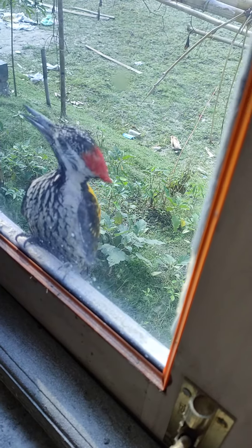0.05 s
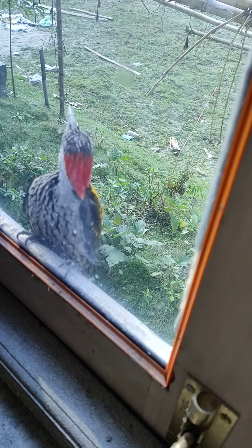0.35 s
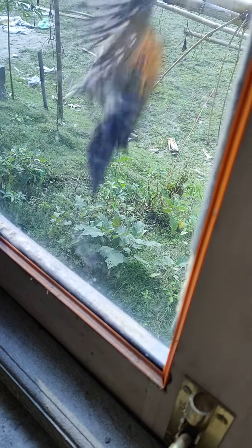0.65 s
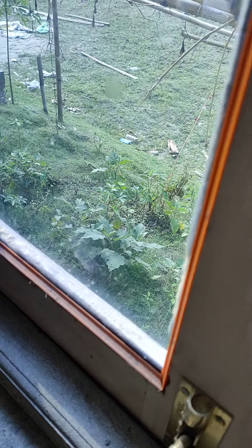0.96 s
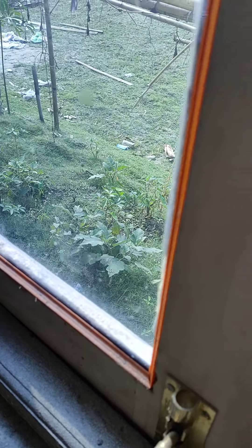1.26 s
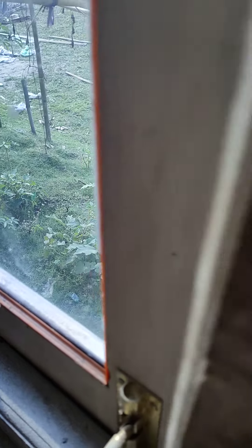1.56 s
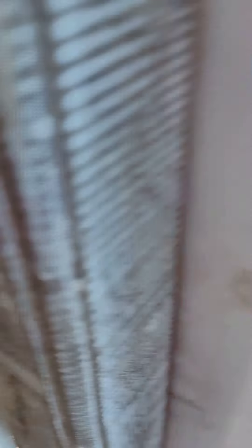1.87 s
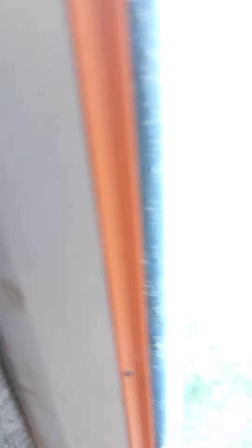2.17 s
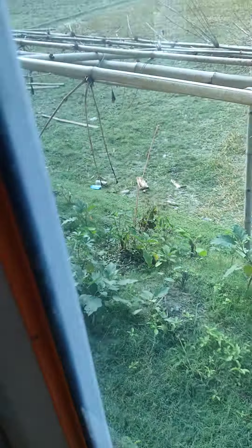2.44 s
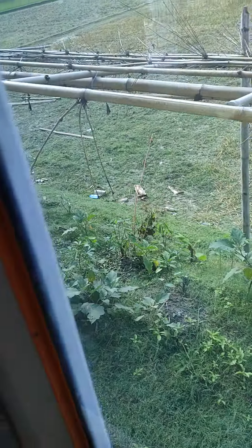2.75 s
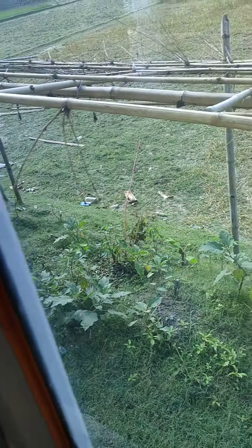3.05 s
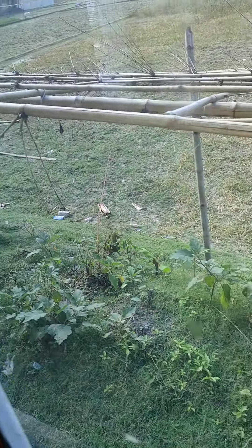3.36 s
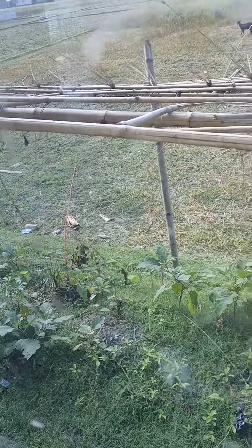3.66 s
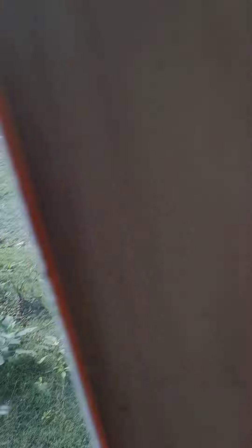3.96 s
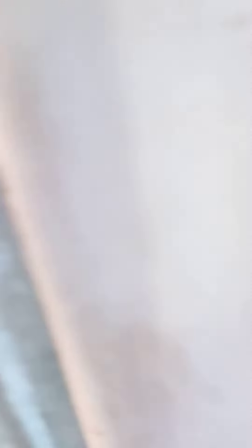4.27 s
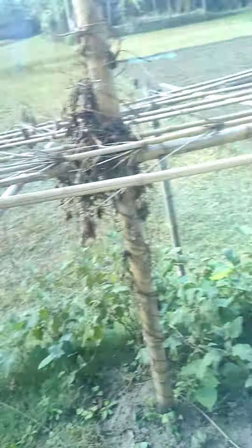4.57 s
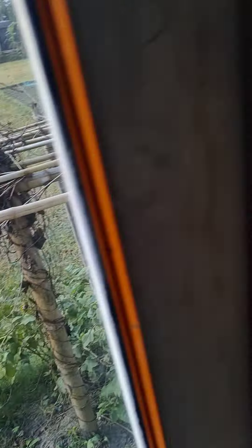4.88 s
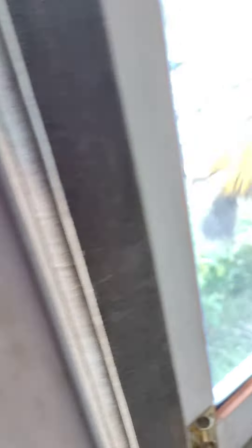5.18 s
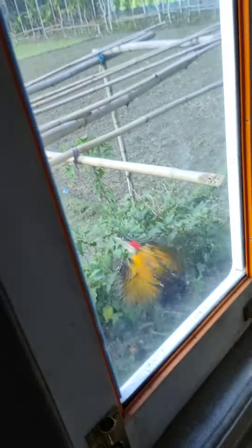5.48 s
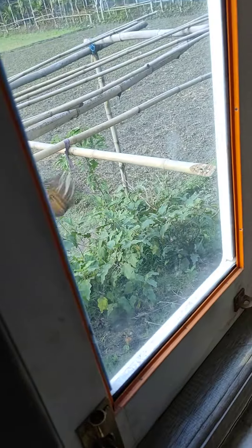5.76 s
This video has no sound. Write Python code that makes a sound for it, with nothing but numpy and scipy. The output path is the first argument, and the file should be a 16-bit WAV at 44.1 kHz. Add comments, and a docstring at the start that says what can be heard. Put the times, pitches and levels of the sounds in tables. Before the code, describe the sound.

A quiet low rumble and soft air run throughout, heard near a window inside a bare, echoing room. At 0.7 seconds a woodpecker's claws softly scuff the frame. Outside, a small bird whistles two faint phrases, around 0.5 to 1.9 and 2.6 to 3.9 seconds, with brief flock chatter, far-off calls and a barely audible insect. Soft wingbeats approach, and at 2.25 seconds the beak hits the pane with a loud glassy clack, a thump and low ringing. A lighter tap follows at 2.5, then light wing brushes and rustles. Wings whoop in again from 4.2 seconds. The two heaviest blows land at 4.5 and 4.8, their echo swelling back after each impact. Three quick, sharp taps follow by 5.0, amid bursts of feathers brushing the glass. Tiny ticks and flutters end around 5.4, and the echo fades into the quiet background.

```python
"""A woodpecker flies at a window pane, strikes it and flutters against it, heard in a bare, echoing room.
Each blow shoves the whole pane (a thump), sets it ringing and makes the glass clack. Wings whoop in
flight and brush the glass; claws scuff the frame. A phone's limiter turns the hard blows down and lets
their echo swell back. Outside, a small bird whistles two phrases over the chatter of its flock.
Behind it all are soft rustles, far-off calls, a faint insect, quiet air and a low rumble."""
import sys
import numpy as np
from scipy import signal
from scipy.fft import rfft, irfft
from scipy.io import wavfile
from scipy.ndimage import uniform_filter1d, minimum_filter1d

SR = 44100
rng = np.random.default_rng(int(sys.argv[2]) if len(sys.argv) > 2 else 0)


def to_wav(s):
    """Save 16-bit WAV."""
    ch = np.atleast_2d(s).T  # columns
    pcm = np.round(np.clip(ch, -1, 1) * 32767)  # PCM
    wavfile.write(sys.argv[1], SR, pcm.astype(np.int16))


N = 261072
T = np.arange(N) / SR

# The bird hits the pane with its weight behind the beak: (time [s], clack [dB], thump [dB], thump [Hz],
# place across the pane [0-1], echo [dB], hollow knock [Hz], knock [dB], boom [Hz], boom [dB])
BLOWS = [(2.249, 8.5, 2, 313, .3, 6, 510, -17, 103, -7),
         (4.4794, 13, 11.5, 375, 0.14, 1.5, 457, -12, 168.3, 1.5),
         (4.8093, 15, 15.5, 320, .27, -3, 1156, -12.5, 100.4, 1.5)]
# Taps of the beak alone: (time [s], clack [dB], ping [Hz], second ping [Hz], echo [dB],
# left minus right [dB])
TAPS = [(2.1477, -30, 3880, 4300, 4, -8), (2.2523, 7, 2680, 3030, -4, -14),
        (2.473, -3.5, 2490, 3050, -5.5, -4), (4.4561, -34, 5550, 4940, 13.5, 0),
        (4.4825, 7, 3220, 2660, -12, -12), (4.885, 2.5, 3220, 3760, -4, -3),
        (4.935, -6, 3550, 4100, 2.5, -6), (5.023, 1, 4030, 5054, -3.5, -2.5),
        (5.2425, -33, 4000, 4260, -6, -11), (5.3175, -31.5, 4140, 4700, -11, -7),
        (5.3357, -22, 3130, 3820, -18, 1.5), (5.358, -33.5, 2830, 1970, -20, -18)]
# Low tones of the bending pane: (pitch [Hz], level [dB], fade time [s])
# A fade time, t60 in the code, is how long a sound takes to drop by 60 dB.
PANE_TONES = [(55.2, -29.5, 1.1), (105.6, -22, 0.732), (177.9, -19, 0.7), (200.2, -21.5, 0.94),
              (231, -20.5, 0.66), (246, -30.5, 1.1), (323, -24.5, 0.33), (391.3, -27, 0.69),
              (483, -31.5, 0.53), (599, -25, 0.17), (841, -19.5, 0.22), (977, -32.5, 0.6),
              (1004, -29, 0.43), (1160, -29, 0.31)]
# Short tones that make up the clack of the glass: (pitch [Hz], level [dB], fade time [s])
CLACK_TONES = [(1068, -41, 0.0054), (1165, -20.5, 0.012), (1477, -34.5, 0.046), (2060, -13.5, 0.034),
               (2456, -27, 0.024), (2570, -47, 0.057), (3310, -28, 0.025), (3485, 0.5, 0.0046),
               (4360, -52.5, 0.005), (5110, -19.5, 0.02), (6240, -33, 0.005), (6030, -34, 0.02)]
# Tone colour of the sharp crack where beak meets glass: (frequency [Hz], level [dB])
CRACK_COLOUR = [(200, -25.5), (700, -7), (1200, 2), (2000, -3.5), (3300, 4.5), (5500, -3), (6600, -6),
                (8000, -27.5), (13000, -27.5), (16000, -59)]
# Tone colour of the pane's dull shudder in its frame: (frequency [Hz], level [dB])
SHUDDER_COLOUR = [(60, -25), (250, -11.5), (450, 2), (800, 0.5), (1200, 4), (1800, -12.5), (4000, -47.5)]
# Wingbeats on the flights towards the pane: (time [s], pitch [Hz], level [dB])
WINGBEATS = [(1.791, 375, -53.5), (1.951, 405, -54), (2.027, 465, -41), (4.19, 380, -55.5),
             (4.27, 380, -53.5), (4.348, 410, -45.5), (4.426, 460, -37.5)]
# Wings brushing the glass: (middle time [s], half length [s], level [dB], extra treble [dB])
WING_BRUSHES = [(2.389, 0.03, -34, 10), (2.497, 0.022, -53, 16.5), (2.585, 0.019, -42.5, 7.5),
                (2.674, 0.055, -55, 4), (2.784, 0.046, -59, 7), (2.862, 0.036, -60.5, 11),
                (2.942, 0.033, -59.5, 11), (4.617, 0.026, -21.5, 2.5), (4.716, 0.028, -29, -3),
                (4.801, 0.025, -40, -9), (4.88, 0.069, -22.5, -4), (4.98, 0.04, -30, -3.5),
                (5.077, 0.024, -30, 2), (5.162, 0.016, -37, 1), (5.245, 0.019, -52, 16),
                (5.276, 0.012, -41.5, 6.5), (5.336, 0.0079, -42.5, 8.5), (5.363, 0.033, -47, 8.5)]
# Lone soft rustles: (middle time [s], half length [s], level [dB], extra treble [dB])
LONE_RUSTLES = [(0.02, 0.15, -59, -23), (0.696, 0.017, -48, -5), (1.457, 0.02, -66.5, 11),
                (2.046, 0.18, -58, -2), (2.152, 0.011, -40, 5), (2.254, 0.056, -44.5, -23),
                (3.332, 0.098, -53.5, -0.5), (3.479, 0.029, -55.5, -21), (3.755, 0.015, -58, -16),
                (3.81, 0.15, -62.5, 1)]
# Tone colour of the brushes and rustles: (frequency [Hz], level [dB])
RUSTLE_COLOUR = [(300, 2), (700, -9.5), (1300, -2.5), (2000, 2.5), (3000, 7.5), (5800, 6.5), (8000, -9.5),
                 (13000, -13), (16000, -23.5)]
# The bird shifts its grip, then pushes off: (time [s], level [dB], rise time [s], fade time [s])
SCUFFS = [(0, -55.5, 0.0055, 0.7), (0.739, -41.5, 0.012, 0.8)]
# Hollow tone colour of those scuffs: (frequency [Hz], level [dB])
SCUFF_COLOUR = [(40, -5), (110, 6.5), (170, 9), (300, 1.5), (550, -10), (1100, 5), (1600, -2.5),
                (2100, -5.5), (3000, -4), (5600, 0.5), (7500, -20), (14000, -43)]
# The small bird's whistles: (time [s], length [s], start pitch [Hz], end pitch [Hz], level [dB])
SONG_NOTES = [(.48, 0.38, 4450, 4430, -75), (.74, 0.336, 4030, 3948, -66.5), (1.13, 0.14, 4980, 4240, -66),
              (1.18, 0.071, 3720, 3660, -63.5), (1.39, 0.11, 3220, 2950, -78),
              (1.32, 0.039, 3910, 3810, -60), (1.45, 0.045, 3870, 3820, -71),
              (1.54, 0.15, 2480, 2360, -78.5), (1.59, 0.057, 3600, 3370, -62),
              (1.69, 0.16, 3400, 3650, -62.5), (1.79, 0.12, 3770, 4070, -61),
              (2.58, 0.276, 4436, 4320, -64.5), (2.8, 0.18, 4040, 3990, -63.5),
              (2.97, 0.32, 3990, 3980, -77.5), (3.14, 0.076, 5100, 4400, -68),
              (3.2, 0.057, 4560, 4520, -75), (3.28, 0.16, 3880, 3780, -66),
              (3.57, 0.054, 4340, 3820, -69.5), (3.73, 0.19, 3900, 4150, -68),
              (5.8, 0.23, 3860, 3840, -75.5)]
# Start and end of the flock's sinking chatter: (time [s], pitch [Hz])
CHATTER = [(1.2, 4340), (1.62, 3320)]
# Far-off calls: (middle time [s], half length [s], pitch [Hz], level [dB])
FAR_CALLS = [(1.1, 0.98, 1247, -71), (1.854, 0.33, 5300, -66), (2.153, 0.2, 4875, -55.5),
             (3.452, 0.31, 1495, -67.5), (0.796, .5, 569, -69.5), (3.533, 0.29, 582, -67)]
# Tone colour of the low rumble: (frequency [Hz], level [dB])
RUMBLE_COLOUR = [(20, -6), (42, 5.5), (70, -3.5), (110, -10.5), (170, -11.5), (260, -21), (500, -39),
                 (1200, -62.5), (4000, -68.5)]
# Tone colour of the quiet air: (frequency [Hz], level [dB])
AIR_COLOUR = [(100, 7), (300, -1.5), (600, -2), (1200, -10), (2000, -13), (2700, -10), (4000, -11),
              (6000, -13.5), (7800, -23.5), (9000, -28.5), (11000, -28.5), (15000, -34)]
# Swells while the bird is near the window: (middle time [s], half length [s], rumble [dB], air [dB])
SWELLS = [(1.004, 1, -63.5, -71.5), (2.06, 0.33, -49, -61.5), (2.946, 0.21, -47, -67.5),
          (3.707, 0.26, -87.5, -69), (4.468, 0.23, -55.5, -65.5), (5.15, 0.67, -50, -64)]
# Bounces off the window recess and nearest wall: (left delay [s], right delay [s], level [dB])
EARLY_ECHOES = [(.0028, 0.0031, -8), (.0046, .0044, -12), (0.0104, .0125, -13.5)]
# The room's long echo, band by band: (frequency [Hz], level [dB], fade time [s])
ROOM_BANDS = [(38, 4.5, 1.9), (107, 15, 0.74), (213, 7.5, 0.69), (434, -0.5, 0.75), (1090, -3, 0.67),
              (2038, -0.5, 0.6), (3270, -3, 0.6), (5970, -2.5, 0.65), (7950, -3.5, 0.35), (14000, -4, .55)]


def pecks(ping_t60=0.016, knock_t60=0.02, right_lag_s=0.00021, pane_stilled_s=5.29, damping_db_per_s=216):
    """Each strike of the beak shoves the pane, sets its low tones ringing and clacks the glass."""
    direct, to_room = np.zeros((2, N)), np.zeros(N)
    t = T[:SR] - np.array([[0], [right_lag_s]])  # the left side hears it first
    late = t - .0005  # the glass rings just after the first push
    glass = sum(undb(db) * (-1) ** k * ring(late, hz, t60)
                for k, (hz, db, t60) in enumerate(CLACK_TONES))
    tones = pane_tones(2 * SR)
    crack, shudder = undb(12) * click(CRACK_COLOUR), undb(13) * click(SHUDDER_COLOUR)
    for start, clack_db, thump_db, thump_hz, place, echo_db, ping_hz, ping2_hz, pan_db, heavy in hits():
        sides = undb(np.array([[pan_db], [-pan_db]]) / 2)
        thump = shove(t, thump_hz)
        clack = glass + undb(-7) * ring(late, ping_hz, ping_t60)
        clack += undb(-9) * ring(late, ping2_hz, ping_t60)
        boom = 0
        if heavy:  # a heavy blow also knocks hollowly and boosts the tones near its boom pitch
            knock_hz, knock_db, boom_hz, boom_db = heavy
            thump += undb(knock_db) * ring(t, knock_hz, knock_t60)
            octaves_away = np.log2(np.array(PANE_TONES)[:, 0] / boom_hz)
            boom = undb(boom_db) * np.exp(-(octaves_away / .12) ** 2)
        add(direct, start, sides * (undb(thump_db) * thump + undb(clack_db) * clack))
        add(direct, start, sides * undb(clack_db - 12) * burst(CRACK_COLOUR, t60=0.028))
        add(direct, start + .001, sides * undb(thump_db - 14) * burst(SHUDDER_COLOUR, t60=0.042))
        # a tone rings most when the pane is struck where that tone bends it most
        strengths = boom + np.sin(np.pi * place * np.arange(1, len(PANE_TONES) + 1))
        # the next blow, or the bird pressing on the glass near the end, stops the ringing
        stop = min([blow[0] for blow in BLOWS if blow[0] > start] + [max(pane_stilled_s, start)])
        damping = undb(-damping_db_per_s * np.maximum(T[:2 * SR] - (stop - start), 0))
        add(direct, start, undb(thump_db) * damping * (strengths @ tones))
        # the room gathers sound from the whole pane, so single tones stand out less
        add(to_room, start, undb(echo_db + thump_db) * (undb(-4) * thump[0] + shudder))
        add(to_room, start, undb(echo_db + clack_db) * (crack + undb(-16) * clack[0]))
    out = direct + undb(2) * room(to_room)
    for left_s, right_s, db in EARLY_ECHOES:
        add(out[0], left_s, undb(db) * direct[0])
        add(out[1], right_s, undb(db) * direct[1])
    return out


def hits(blow_pings_hz=(3263, 3400), blow_pan_db=3.13, tap_thump_hz=320, tap_place=0.25):
    """List the heavy blows and the taps in one form; each has two pings from the struck spot."""
    rows = [(*blow[:6], *blow_pings_hz, blow_pan_db, blow[6:]) for blow in BLOWS]
    for start, clack_db, *pings_hz, echo_db, pan_db in TAPS:
        thump_db = -11.5 + 1.4 * clack_db  # light taps barely move the pane
        rows.append((start, clack_db, thump_db, tap_thump_hz, tap_place, echo_db,
                     *pings_hz, pan_db, None))
    return rows


def shove(t, hz, cycles=0.67, press_s=0.00042, leak_hz=95):
    """The pane jumps in and springs back: about one wave of pressure, whose deepest bass leaks away."""
    t = np.maximum(t, 0)
    rise = 1 - np.exp(-(t / press_s) ** 2)
    push = np.sin(2 * np.pi * hz * t) * np.exp(-(t * hz / cycles) ** 2) * rise
    return signal.lfilter(*signal.butter(1, leak_hz, "high", fs=SR), push)


def pane_tones(size, pitch_waver=0.0077, flicker_db=1):
    """The bending pane's tones waver in pitch and strength as it shifts in its frame."""
    slow_noise = colour(rng.standard_normal((2, len(PANE_TONES), size)), [(7, -7), (25, -63.5)])
    drifts, flickers = unit(slow_noise)
    clocks = np.cumsum(1 + pitch_waver * drifts, axis=1) / SR
    return np.array([undb(db + flicker_db * flicker) * ring(t, hz, t60)
                     for (hz, db, t60), t, flicker in zip(PANE_TONES, clocks, flickers)])


def thin_ring(start_s=2.15, level_db=-54.5):
    """The first light tap leaves a faint, high ring at the window."""
    return undb(level_db) * ring(T - start_s, hz=2660, t60=.4)


def wingbeats(half_length_s=0.008, room_db=1):
    """Wings whoop louder as the bird nears the pane; the last, braking beat is the highest."""
    out = sum(undb(db) * swell(middle, half_length_s) * np.sin(2 * np.pi * hz * (T - middle))
              for middle, hz, db in WINGBEATS)
    return out + undb(room_db) * room(out)


def rustles(grain_db=3, room_db=-3):
    """Wings brush the glass in short puffs of grainy noise; a few soft rustles come on their own."""
    grain = jitter(samples=90)
    noise = unit(colour(stereo_noise(N) * undb(grain_db * grain), RUSTLE_COLOUR))
    treble = colour(noise, [(6500, -19.5), (8500, -2.5)])
    body_level, treble_level = 0, 0
    for middle, half_length, db, treble_db in LONE_RUSTLES + WING_BRUSHES:
        level = undb(db) * swell(middle, half_length)
        body_level += level
        treble_level += undb(treble_db) * level
    out = (noise - treble) * body_level + treble * treble_level
    return out + undb(room_db) * room(out[0])


def scuffs(grain_db=2, room_db=-9):
    """Claws and feathers scuff the frame: a quick rise and a grainy fade."""
    grain = jitter(samples=200)
    level = 0
    for start, db, rise_s, t60 in SCUFFS:
        t = np.maximum(T - start, 0)
        level += undb(db - 60 * t / t60) * (1 - np.exp(-t / rise_s))
    out = level * unit(colour(stereo_noise(N) * undb(grain_db * grain), SCUFF_COLOUR))
    return out + undb(room_db) * room(out[0])


def small_birds(waver_hz=42, rasp=0.19, chirps=24, chirp_s=0.035, fall_hz=300, chirp_db=-72):
    """One bird whistles while its flock adds short falling chirps; both arrive mostly as echo."""
    song = np.zeros(N)
    quiver = unit(colour(rng.standard_normal(N), [(250, 19), (900, -55)]))
    notes = list(SONG_NOTES)
    chirp_times = np.linspace(CHATTER[0][0], CHATTER[-1][0], chirps)
    for start, (late, detune) in zip(chirp_times, rng.uniform(-1.1, 1, (chirps, 2))):
        hz = np.interp(start, *np.transpose(CHATTER)) * (1 + 0.19 * detune)
        notes.append((start + late * chirp_s / 2, chirp_s, hz + fall_hz / 2, hz - fall_hz / 2, chirp_db))
    for start, length, start_hz, end_hz, db in notes:
        progress = np.linspace(0, 1, int(length * SR))
        glide_hz = end_hz - start_hz
        wobble_hz = waver_hz + rasp * abs(glide_hz)  # notes that slide far are raspy
        hz = start_hz + glide_hz * progress + wobble_hz * np.roll(quiver, -int(start * SR))[:len(progress)]
        whistle = np.sin(2 * np.pi * np.cumsum(hz) / SR)
        add(song, start, undb(db) * np.sin(np.pi * progress) * whistle)
    return undb(-11) * song + undb(18) * room(song)


def far_calls(width=0.041):
    """Faint calls from far off, blurred into narrow bands of noise."""
    out = np.zeros((2, N))
    for middle, half_length, hz, db in FAR_CALLS:
        size = int(2 * half_length * SR)
        band = signal.butter(2, [hz * (1 - width), hz * (1 + width)], "band", fs=SR, output="sos")
        call = unit(signal.sosfilt(band, rng.standard_normal((2, 2 * SR))[:, :size]))
        add(out, middle - half_length, undb(db) * np.hanning(size) * call)
    return out


def insect(band_hz=(8400, 9100), level_db=-85.5, throb_db=2.5, until_s=4.2, fade_s=.1):
    """An insect's thin, throbbing shrill outside fades as the listener turns away."""
    band = signal.butter(2, band_hz, "band", fs=SR, output="sos")
    level = undb(level_db + throb_db * jitter(samples=1500))
    fade = (1 - np.tanh((T - until_s) / fade_s)) / 2
    return level * fade * unit(signal.sosfilt(band, stereo_noise(N)))


def background(rumble_db=-51.5, air_db=-62, lull_db=-4.5):
    """Low rumble and quiet air run throughout and rise in the same swells."""
    rumble_level, air_level = undb(rumble_db), undb(air_db)
    for middle, half_length, rumble_swell_db, air_swell_db in SWELLS:
        bump = swell(middle, half_length)
        rumble_level += undb(rumble_swell_db) * bump
        air_level += undb(air_swell_db) * bump
    air_level *= undb(lull_db * swell(0.44, 0.17))  # the air dips before the take-off
    rumble = unit(colour(stereo_noise(N), RUMBLE_COLOUR))
    air = unit(colour(stereo_noise(N), AIR_COLOUR))
    return rumble * rumble_level + air * air_level


def room(x, build_s=0.0017, size=65536):
    """Hard walls give a dense echo in which each band of pitch dies away at its own rate."""
    t, freqs = T[:size], np.fft.rfftfreq(size, 1 / SR)
    hz, dbs, t60s = np.transpose(ROOM_BANDS)
    noise, echo = rfft(stereo_noise(size)), 0
    for share, db, t60 in zip(np.eye(len(hz)), dbs, t60s):
        band = irfft(noise * np.interp(np.log(freqs + 1), np.log(hz), share))
        fade = undb(-60 * t / t60) * (1 - np.exp(-t / build_s))
        echo += undb(db) * band * fade / np.linalg.norm(fade)
    return signal.fftconvolve(x[None], echo, axes=1)[:, :N]


def ring(t, hz, t60, press_s=0.000067):
    """A struck tone, silent before t = 0; the beak takes a moment to press home."""
    t = np.maximum(t, 0)
    return np.sin(2 * np.pi * hz * t) * undb(-60 * t / t60) * (1 - np.exp(-(t / press_s) ** 2))


def burst(points, t60, rise_s=0.00025, size=4096):
    """A puff of stereo noise that rises fast and dies away."""
    t = T[:size]
    noise = unit(colour(rng.standard_normal((2, size)), points))
    return noise * undb(-60 * t / t60) * (1 - np.exp(-(t / rise_s) ** 2))


def click(points):
    """A single pulse with the given tone colour."""
    return colour(signal.unit_impulse(2 * SR, idx=96), points)[:SR]


def swell(middle, half_length):
    """A smooth rise and fall in level around the middle time."""
    level = np.zeros(N)
    near = slice(*np.searchsorted(T, [middle - 2 * half_length, middle + 2 * half_length]))
    level[near] = np.exp(-2 * ((T[near] - middle) / half_length) ** 2)
    return level


def jitter(samples):
    """A random wobble; averaging over more samples makes it slower."""
    return unit(uniform_filter1d(rng.standard_normal(N), size=samples))


def stereo_noise(size, alike_hz=600):
    """White noise whose left and right are alike in the bass and unrelated in the treble."""
    mid, side = rfft(rng.standard_normal((2, size)))
    alike = .92 / (1 + (np.fft.rfftfreq(size, 1 / SR) / alike_hz) ** 4)
    mid, side = mid * np.sqrt((1 + alike) / 2), side * np.sqrt((1 - alike) / 2)
    return irfft(np.array([mid + side, mid - side]), size)


def colour(x, points):
    """Shape the tone of x along a curve of (frequency [Hz], level [dB]) points."""
    hz, db = np.transpose(points)
    freqs = np.fft.rfftfreq(x.shape[-1], 1 / SR)
    return irfft(rfft(x) * undb(np.interp(np.log(freqs + 1), np.log(hz), db)), x.shape[-1])


def add(out, start, x):
    """Mix x into out from the start time, in seconds."""
    i = max(int(start * SR), 0)
    out[..., i:i + x.shape[-1]] += x[..., :N - i]


def unit(x):
    """Scale x to an average strength (rms) of 1."""
    return x / np.sqrt(np.mean(x ** 2))


def undb(db):
    """Turn decibels into a number to multiply by."""
    return 10 ** (np.asarray(db) / 20)


def scene():
    """The woodpecker at the window and everything around it, in stereo."""
    return (pecks() + thin_ring() + small_birds() + rustles() + background()
            + wingbeats() + scuffs() + insect() + far_calls())


def record(dry, ceiling_db=-1, recover_db_per_s=42, top_hz=14900):
    """A limiter turns down just ahead of each loud peak and recovers slowly; the top treble is cut."""
    over_db = np.maximum(20 * np.log10(np.abs(dry).max(0) + 1e-9) - ceiling_db, 0)
    cut_db = np.maximum.accumulate(over_db + recover_db_per_s * T) - recover_db_per_s * T
    gain = uniform_filter1d(minimum_filter1d(undb(-cut_db), size=129), size=129)
    return signal.sosfilt(signal.ellip(8, .2, 70, top_hz, fs=SR, output="sos"), dry * gain)


dry = scene()
out = record(dry)
to_wav(out)
```